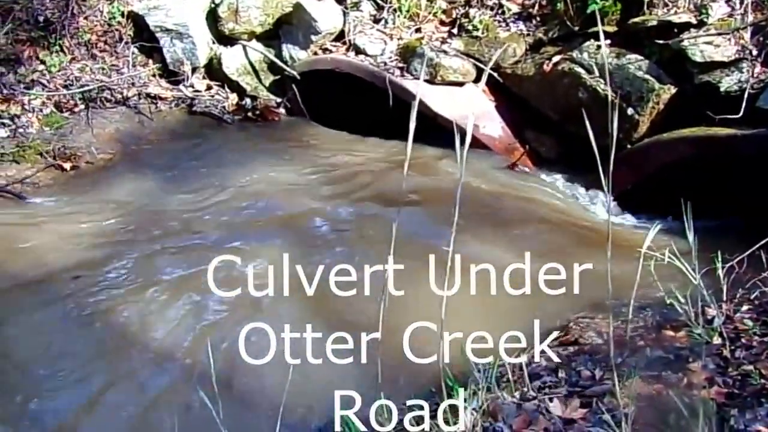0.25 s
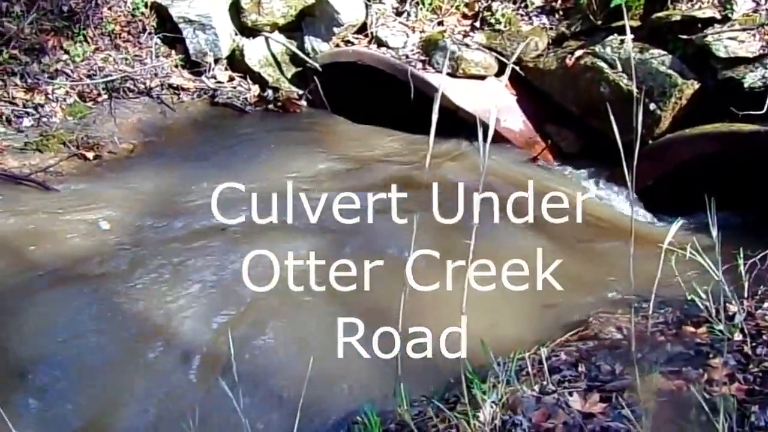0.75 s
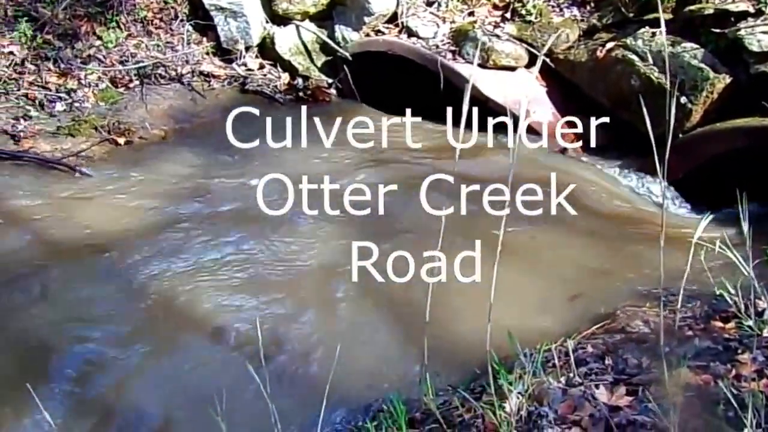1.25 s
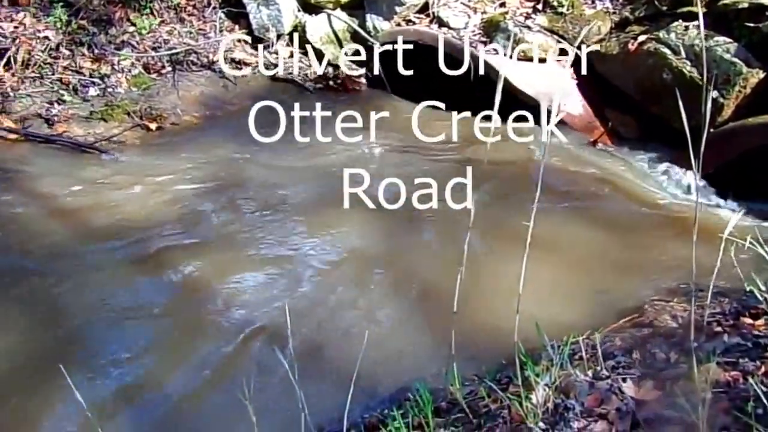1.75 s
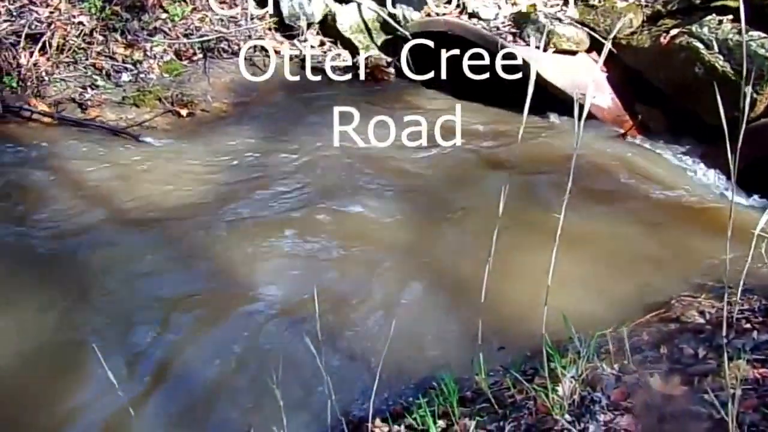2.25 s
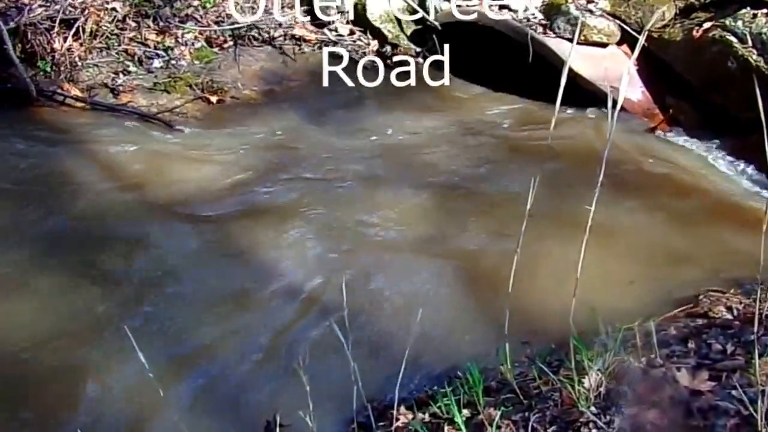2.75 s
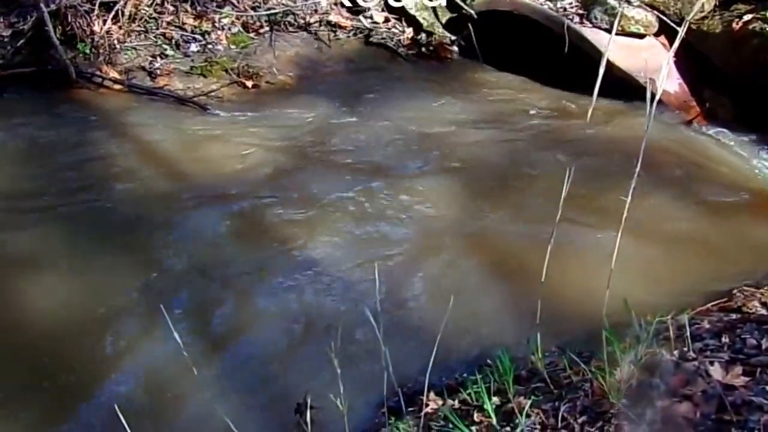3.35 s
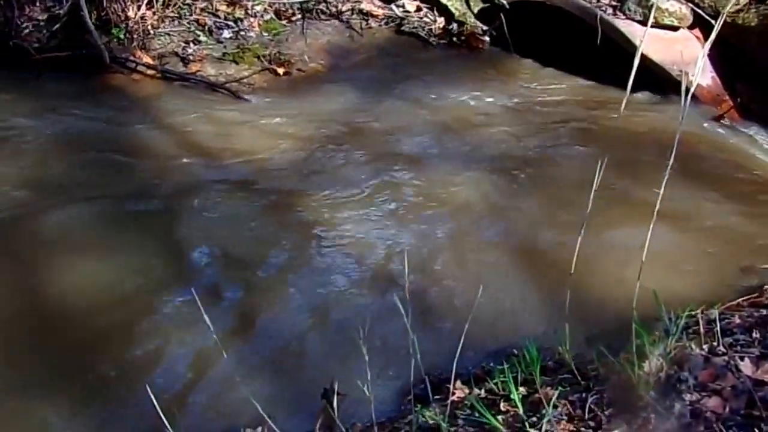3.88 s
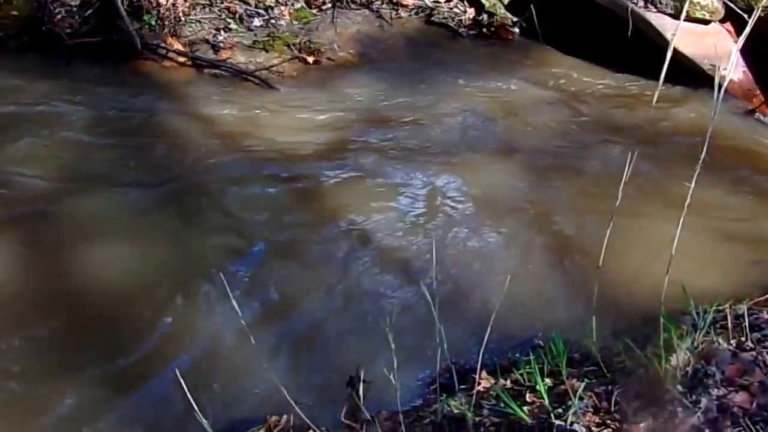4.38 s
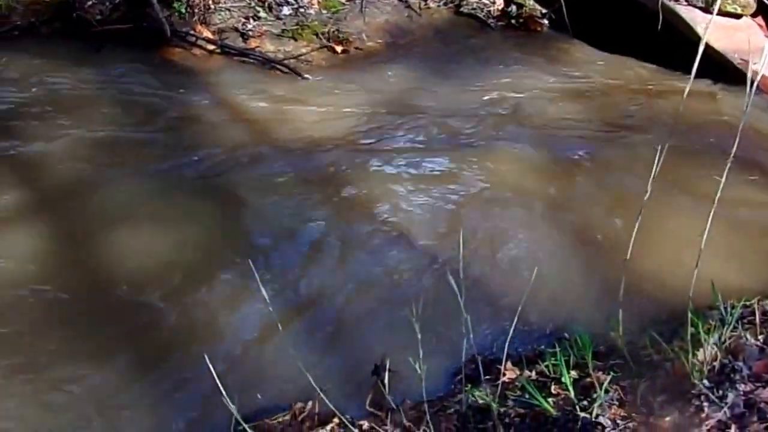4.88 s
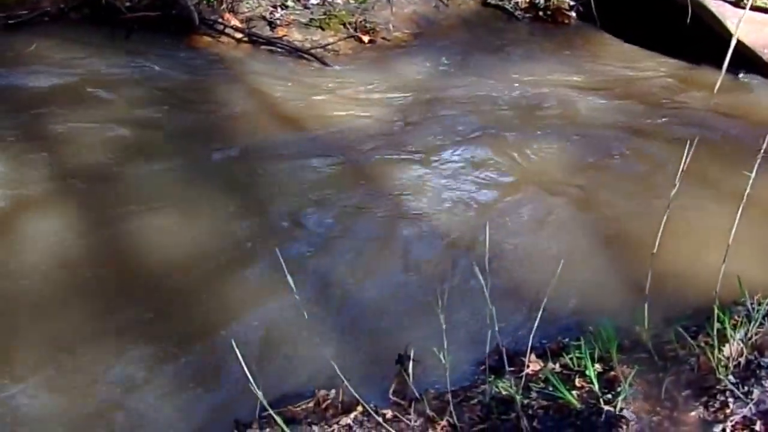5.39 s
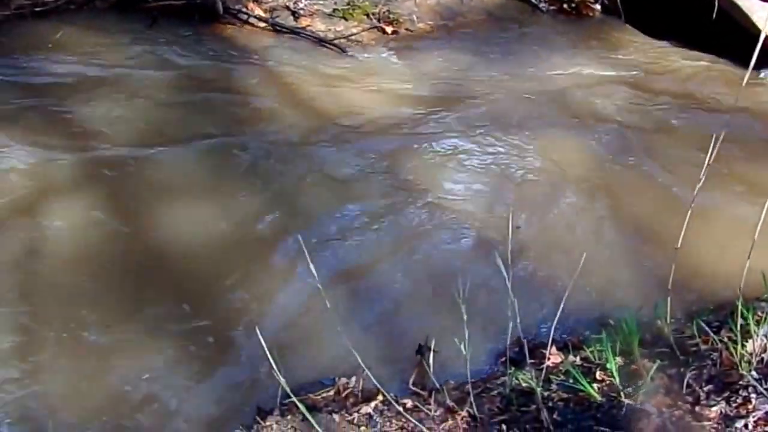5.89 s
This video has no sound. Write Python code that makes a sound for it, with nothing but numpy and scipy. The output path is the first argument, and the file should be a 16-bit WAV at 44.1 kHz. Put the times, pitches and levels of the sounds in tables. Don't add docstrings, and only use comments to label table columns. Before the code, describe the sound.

Continuous churning water pours out of a pipe outdoors, spoiled by loud faulty-connection crackles, mostly on the left, and occasional handling knocks.

```python
import sys
import numpy as np
from scipy import signal
from scipy.io import wavfile
from scipy.ndimage import uniform_filter1d

SR = 44100
rng = np.random.default_rng(int(sys.argv[2]) if len(sys.argv) > 2 else 0)


def volts(x):
    e = np.asarray(x, float) / 20
    return 10 ** e


def waveform_to_disk(signal):
    frames = np.transpose(np.atleast_2d(signal))
    scaled = np.clip(frames, -1, 1) * 32767
    samples = np.round(scaled).astype(np.int16)
    wavfile.write(sys.argv[1], SR, samples)


N = 270333


def evened(x):
    return x / np.sqrt(np.mean(x ** 2) + 1e-20)


def read(points, hz):
    f, value = np.transpose(points)
    return np.interp(np.log(hz + 1), np.log(f + 1), value)


def span(start_s, length_ms):
    start = round(start_s * SR)
    return slice(start, start + max(round(length_ms * SR / 1000), 1))


# start_s, peak_db
KNOCK_EVENTS = [
    (2.2, -9.5),
    (3.6934, -10.5),
    (3.839, -29),
    (4.2003, -11),
    (4.7836, -9),
    (5.167, -5.5),
    (5.79, -8.5),
]


def knocks(ring_hz=800, ring_t60_s=0.013, rattle=2.7, rattle_t60_s=0.0066, push=1.0):
    t = np.arange(1500) / SR
    out = np.zeros(N)
    grits = rng.standard_normal((len(KNOCK_EVENTS), len(t)))
    for (start_s, peak_db), grit in zip(KNOCK_EVENTS, grits):
        ring = (push - np.sin(2 * np.pi * ring_hz * t)) * volts(-60 * t / ring_t60_s)
        clatter = rattle * grit * volts(-60 * t / rattle_t60_s)
        start = round(start_s * SR)
        out[start:start + len(t)] += volts(peak_db) * (ring + clatter)
    return out


def bubbles(per_s=900, spread_db=3.0, cycles=7.0, glide=.15, count=24):
    born = rng.random(N) < per_s / SR
    size = volts(spread_db * np.minimum(rng.exponential(1, N), 5)) * born
    kind = rng.integers(0, count, N)
    out = np.zeros(N)
    for k, pitch_hz in enumerate(np.geomspace(300, 9000, count)):
        turns = np.arange(1200) / SR * pitch_hz
        tone = np.sin(2 * np.pi * turns * (1 + glide * turns / cycles)) * np.exp(-3 * turns / cycles)
        tone *= np.sqrt(pitch_hz / 1000)
        out += signal.oaconvolve(size * (kind == k), tone)[:N]
    return evened(out)


# start_s, level_db
SURGE = [(0.0, -36), (0.12, -37), (0.29, -39), (0.77, -35.5), (1.06, -39.5), (1.38, -39.5), (1.53, -38),
         (1.67, -36.5), (2.0, -41.5), (2.73, -36), (3.4, -39), (3.81, -34), (4.68, -39), (5.07, -36),
         (5.51, -42.5), (5.82, -40), (6.01, -37.5), (6.13, -35.5)]
# centre_hz, layer (0 rush, 1 pipe ring, 2 fizz)
LAYER_AT = [(1300, 0), (1600, 1), (2300, 1), (3200, 2)]
FOLLOWS = (.3, 0.87, 0.1)
DULLING = (0.21, 0.03, -.25)


def rush(patchy_db=1.56, flicker_db=1.0, surge_db=2.5, usual_db=-38):
    hop, size = 128, 512
    frames = N // hop + 5
    hz = np.fft.rfftfreq(size, 1 / SR)
    a, b, patches, surges = rng.standard_normal((frames, len(hz), 4)).T
    patches = uniform_filter1d(uniform_filter1d(patches, size=5, axis=0), size=16, axis=1)
    surges = evened(uniform_filter1d(uniform_filter1d(surges, size=4, axis=0), size=60, axis=1))
    surges *= 1 / (1 + (hz[:, None] / 5500) ** 4)
    flicker = evened(uniform_filter1d(rng.standard_normal(frames), size=3))
    field_db = patchy_db * evened(patches) + flicker_db * flicker + surge_db * surges
    t = np.arange(frames) * hop / SR
    start_s, level_db = np.transpose(SURGE)
    swell_db = np.interp(t, start_s, level_db) - usual_db
    for layer, (follows, dulling_db_per_s) in enumerate(zip(FOLLOWS, DULLING)):
        share = np.maximum(1 - abs(read(LAYER_AT, hz) - layer), 0)
        field_db = field_db + share[:, None] * (follows * swell_db + dulling_db_per_s * t)
    spectra = (a + 1j * b) * volts(field_db)
    return evened(signal.istft(spectra, nperseg=size, noverlap=size - hop)[1][:N])


# centre_hz, level_db
COLOUR = [(40, -61), (110, -25), (220, -6), (600, -7.5), (1400, -5), (1900, 5.5), (2250, -2.5),
          (2700, -13.5), (4000, -28), (5200, -15.5), (6900, -4), (8500, -10), (12500, -20), (15500, -32.5)]
NOTCH_HZ = (400, 1490, 1750, 2050, 2410, 3700, 4350, 4650, 5420, 6350, 7450, 8000, 11720, 14720)
# width_hz, depth_db
NOTCH_SHAPES = [(49.4, -6.5), (81.5, -9.5), (90.5, -20.5), (72.8, -12), (108, -15.5), (186, -18.5),
                (150, -11), (163.6, -8.5), (262.5, -25), (394, -14.5), (357, -57.5), (155, -19),
                (185.5, -18.5), (199, -11)]


def housing(x):
    hz = abs(np.fft.fftfreq(16384, 1 / SR))
    gain = volts(read(COLOUR, hz))
    for notch_hz, (width_hz, depth_db) in zip(NOTCH_HZ, NOTCH_SHAPES):
        off = ((hz - notch_hz) / width_hz) ** 2
        gain *= np.sqrt((off + volts(2 * depth_db)) / (off + 1))
    log_gain = np.log(gain)
    minimum_phase = np.exp(log_gain - 1j * signal.hilbert(log_gain).imag)
    taps = np.fft.ifft(minimum_phase).real[:6000]
    return signal.oaconvolve(x, taps)[:N]


def scene():
    water = housing(rush() + volts(-11.5) * bubbles())
    mono = volts(-33) * evened(water) + volts(-0.5) * housing(knocks())
    return np.array([mono, mono])


# start_s, length_ms, lost_0_1 (share of level)
DROPOUTS = [(0.0, 27, 0.4), (0.172, 8.3, 0.9), (0.365, 117, 0.07), (0.546, 110, 0.55), (0.668, 31, 0.8),
            (0.715, 133, 0.68), (0.854, 35, 0.72), (1.232, 140, 0.02), (1.35, 36, 0.3), (1.386, 30, 0.55),
            (1.411, 27, 0.18), (1.533, 35, 0.74), (2.591, 130, 0.04), (2.748, 14, 0.7), (3.193, 37, 0.07),
            (3.376, 58, 0.42), (3.438, 132, 0.03), (3.748, 220, 0.04), (4.039, 61, 0.6), (4.093, 100, 0.11),
            (4.186, 11, 0.86), (4.222, 68, 0.35), (4.951, 230, 0.19), (5.377, 28, 0.5), (5.404, 45, 0.2),
            (5.513, 108, 0.32), (5.643, 105, 0.57), (5.941, 30, 0.8), (5.979, 19.7, 0.73), (6.099, 38, 0.2)]


def dropped(x, flutter=.8, upward_bias=0.47, kept=.22, scatter=.13):
    quick, slow, jitter = rng.standard_normal((3, N))
    clumps = evened(uniform_filter1d(quick, size=4)) + flutter * evened(uniform_filter1d(slow, size=90))
    clumps -= upward_bias * evened(x)
    gain = np.ones(N)
    for start_s, length_ms, lost in DROPOUTS:
        part = span(start_s, length_ms)
        hit_share = np.clip(lost / (1 - kept), 0, .97)
        hit = clumps[part] < np.quantile(clumps[part], hit_share)
        gain[part] = np.where(hit, kept + scatter * jitter[part], 1)
    return x * gain


def ticked(x, ticks):
    out = x.copy()
    for start_s, spike_db, *direction in ticks:
        out[span(start_s, .02)] += np.sign(np.prod(direction)) * volts(spike_db + 3)
    return out


def crackled(x, bursts, chance=1.15, flutter=.45, lowest=0.33):
    calm = flutter * evened(uniform_filter1d(rng.standard_normal(N), size=70))
    up, down = evened(x) + chance * rng.standard_normal((2, N)) + [calm, -calm]
    size = rng.uniform(lowest, 1.34, N)
    small = rng.standard_normal(N)
    out = x.copy()
    for start_s, length_ms, spike_db, share, downward in bursts:
        part = span(start_s, length_ms)
        share, downward = np.clip([share, downward], 0, 1)
        downward *= min(share / .35, 1)
        rise_limit = np.quantile(up[part], share * (1 - downward))
        fall_limit = np.quantile(down[part], 1 - share * downward)
        rises = (up[part] <= rise_limit) & (downward < 1)
        falls = (down[part] >= fall_limit) & (downward > 0) & ~rises
        fuzz = .35 * min(share, .5) * small[part]
        out[part] += volts(spike_db) * (size[part] * (rises - 1. * falls) + fuzz)
    return out


def faulty(x, upward, both_ways, down_share, ticks, linger_db=-10.5, linger_ms=2.8, wander_db=1.07):
    bursts = [(*row, .04) for row in upward]
    bursts += [(*row, down_share) for row in both_ways]
    spikes = crackled(x, bursts) - x
    drift, grit = rng.standard_normal((2, N))
    keep = np.exp(-1000 / (linger_ms * SR))
    linger = signal.filtfilt([1 - keep], [1, -keep], abs(spikes) + 1e-18)
    wander = evened(uniform_filter1d(uniform_filter1d(drift, size=100), size=100))
    spikes *= volts(wander_db * wander)
    return ticked(x + spikes + volts(linger_db) * linger * grit, ticks)


# start_s, length_ms, spike_db, hit_0_1 (share of samples)
LEFT_UPWARD = [(0.03, 36.5, -4.5, 0.1), (0.064, 23, -4.5, 0.12), (0.0895, 19, -3, 0.12),
               (0.1123, 6.7, 0, 0.16), (0.3235, 4.9, -11.5, 0.3), (0.3535, 14.5, -4.5, 0.13),
               (0.507, 7.8, -2, 0.17), (0.6973, 10.6, -9.5, 0.04), (0.7107, 8.4, -10, 0.2),
               (4.162, 3.7, -3.5, 0.12), (4.216, 6.6, -5.5, 0.21), (4.2824, 6, -3.5, 0.03),
               (4.3241, 10.7, -0.5, 0.02), (4.6615, 8.3, -1.5, 0.06), (4.6781, 2.3, -3, 0.08),
               (4.939, 2.77, -3, 0.17), (5.0177, 6.6, 0, 0.25), (5.0245, 18, -3.5, 0.13),
               (5.2173, 9.2, -1.5, 0.36), (5.2262, 4.7, -8, 0.17), (5.2317, 11.3, -1, 0.33),
               (5.2426, 40.8, -6.5, 0.36), (5.758, 4.9, 3, 0.2), (5.7866, 6.6, -1, 0.53),
               (5.867, 27, -12, 0.4), (5.894, 50.4, -12, 0.23), (5.973, 11, -13.5, 0.3),
               (6.0882, 16, -11, 0.15)]
# start_s, length_ms, spike_db, hit_0_1
LEFT_BOTH_WAYS = [(0.1058, 1.4, -6, 0.4), (0.1177, 6.3, -11, 0.9), (0.1251, 8.5, -5.5, 0.67),
                  (0.135, 2.9, -6, 0.3), (0.1376, 20.5, -5.5, 0.35), (0.157, 5.5, -10, 0.26),
                  (0.1634, 6.4, -3, 0.33), (0.312, 11.2, -4.5, 0.6), (0.331, 5.9, -10, 0.35),
                  (0.335, 16, -8.5, 0.52), (0.443, 16.8, -6, 0.3), (0.4732, 13, -5.5, 0.38),
                  (0.487, 16.5, -5.5, 0.44), (0.524, 16.5, -4, 0.32), (0.5446, 3.2, -10, 0.2),
                  (0.8924, 6.3, -0.5, 0.45), (0.901, 3.5, -13, 0.18), (4.1696, 14.2, -4.5, 0.4),
                  (5.004, 8.6, 0, 0.26), (5.7636, 15, -1.2, 0.7), (5.778, 6.2, -1, 0.24),
                  (5.8048, 12, 2.5, 0.45), (5.8192, 41.3, -1.5, 0.83), (5.8593, 7.9, -9, 0.5),
                  (5.9989, 5.1, -1, 0.32), (6.004, 58, -10.5, 0.47), (6.0633, 8.5, -14.5, 0.34),
                  (6.0692, 18, -12, 0.43)]
# start_s, spike_db
LEFT_TICKS = [(0.307, 2), (0.431, -1), (0.4323, -9), (0.5788, -12), (0.5936, -3), (0.6025, -4),
              (0.6056, -9), (0.617, -14), (0.8914, 2), (0.8919, 0), (1.5124, -3), (1.5187, -5),
              (1.5188, -4), (1.5187, 1), (1.536, -6), (4.0345, 0), (4.0365, 2), (4.0354, -11), (4.0408, -5),
              (4.188, -10), (4.205, 0), (4.2075, -7), (4.2763, 1), (4.2768, -6), (4.278, -1), (4.2803, 1),
              (4.9553, -2.5), (5.9562, -14), (5.9698, -14)]


def left_link(x):
    return faulty(dropped(x), LEFT_UPWARD, LEFT_BOTH_WAYS, .46, LEFT_TICKS)


# start_s, length_ms, spike_db, hit_0_1 (share of samples)
RIGHT_UPWARD = [(0.031, 0.67, 0, 0.12), (0.038, 4.3, -1, 0.09), (0.0813, 3.6, -3.5, 0.15),
                (0.105, 2.5, 0, 0.074), (0.321, 1.5, -15, 0.42), (0.4459, 1.1, -2, 0.14),
                (0.526, 14.2, -1.5, 0.23), (0.8951, 4.2, -4, 0.33), (5.8126, 4.7, -2, 0.03),
                (5.8658, 3.2, -4.5, 0.24), (6.0088, 2.2, 2, 0.13), (6.015, 3.5, -2, 0.08),
                (6.0205, 4.4, -8, 0.25), (6.0254, 4.8, 1.5, 0.09), (6.029, 3.4, -13, 0.4),
                (6.033, 2.7, 5, 0.1), (6.0366, 2.1, -5, 0.7), (6.0385, 9.3, -3, 0.32),
                (6.0694, 5.6, -3.5, 0.09)]
# start_s, length_ms, spike_db, hit_0_1
RIGHT_BOTH_WAYS = [(0.1299, 3.3, 3, 0.53), (0.1517, 2.7, -1, 0.26), (0.1588, 3.3, -20, 0.4),
                   (0.1641, 2.7, -9, 0.2), (0.1684, 2, -1, 0.4), (0.3174, 4.4, -1, 0.38),
                   (0.4966, 1.4, 3, 0.16), (0.501, 1.5, -13, 0.33), (0.51, 2, -14, 0.7),
                   (0.521, 3.3, -12, 0.1), (0.8935, 2.2, 0, 0.7), (6.0483, 2.5, -20, 0.5)]
# start_s, spike_db, direction (+1 up, -1 down)
RIGHT_TICKS = [
    (0.06, 6, 1),
    (0.8912, 3, 1),
    (1.251, -11, 1),
    (3.4069, -3.5, -1),
    (3.837, -8.5, -1),
    (4.2208, -5, -1),
    (4.662, 2, -1),
    (5.213, -11, -1),
    (5.8188, -2, 1),
    (5.871, 2, 1),
]


def right_link(x):
    return faulty(x, RIGHT_UPWARD, RIGHT_BOTH_WAYS, .55, RIGHT_TICKS)


def roll_off(x):
    return signal.sosfilt(signal.butter(12, 15780, fs=SR, output="sos"), x)


def record(dry):
    left = left_link(dry[0])
    right = right_link(dry[1])
    mix = np.clip([left, right], -1.2, 1.2)
    return roll_off(mix)


dry = scene()
out = record(dry)
waveform_to_disk(out)
```